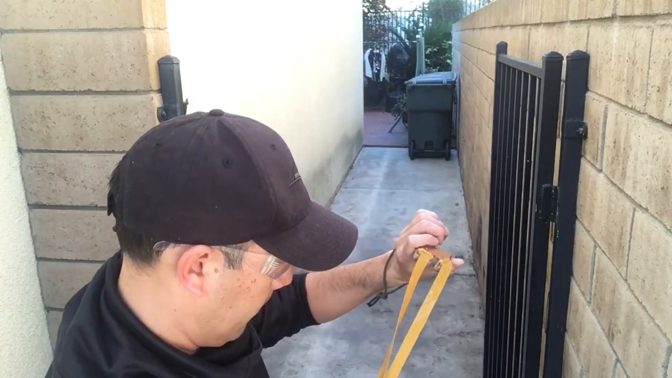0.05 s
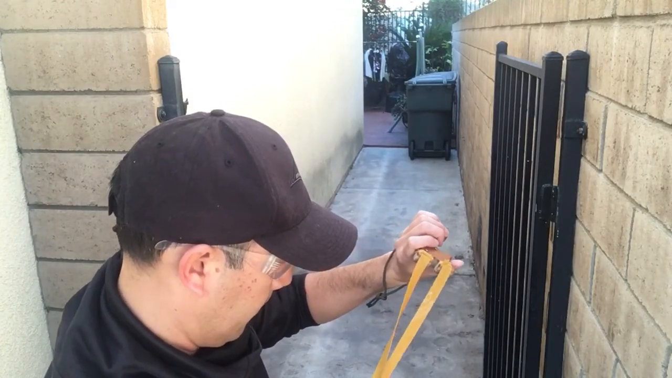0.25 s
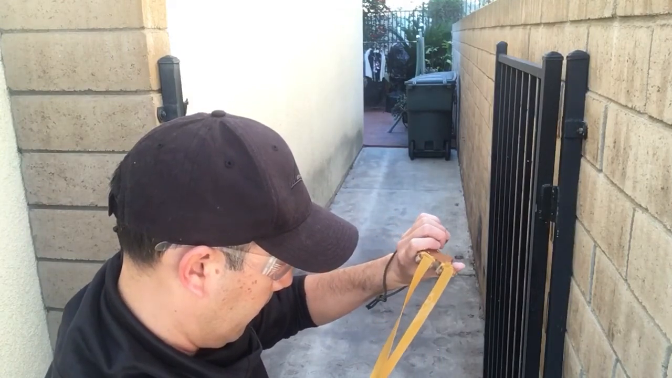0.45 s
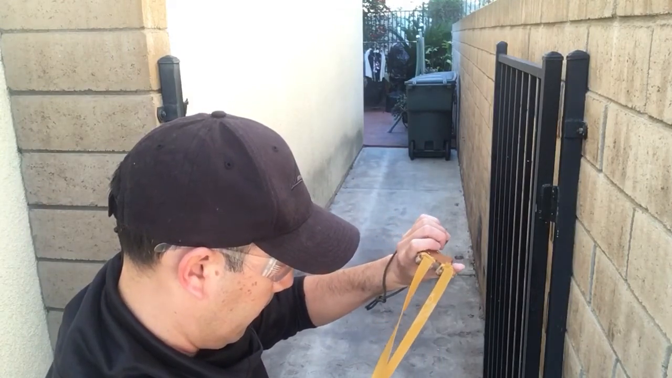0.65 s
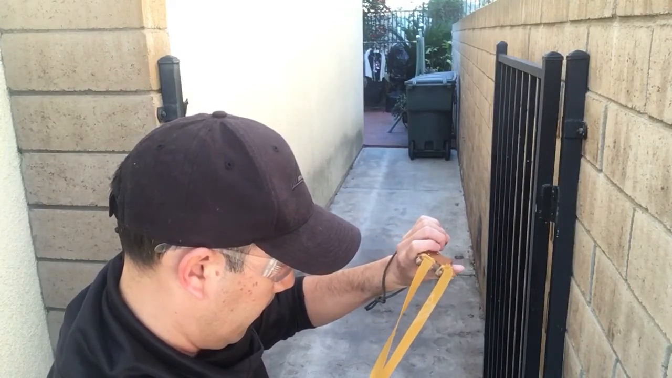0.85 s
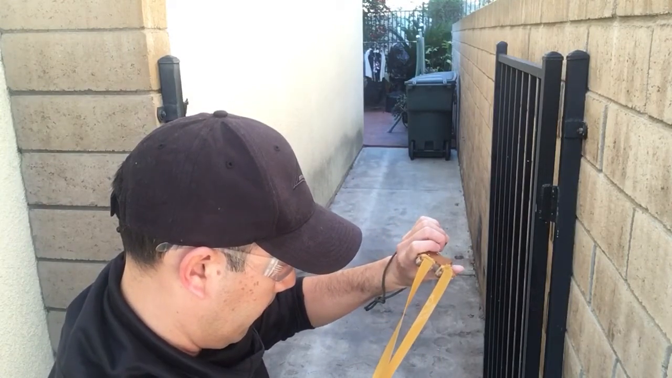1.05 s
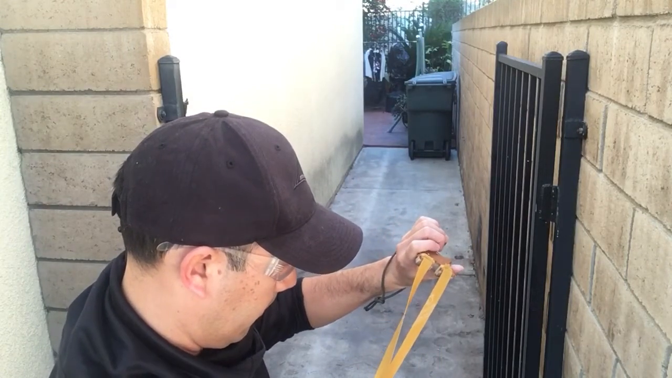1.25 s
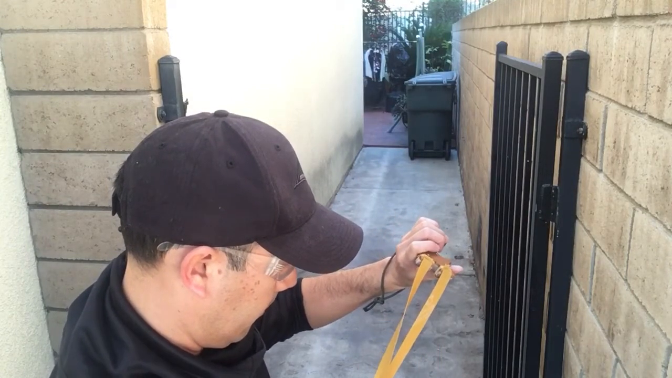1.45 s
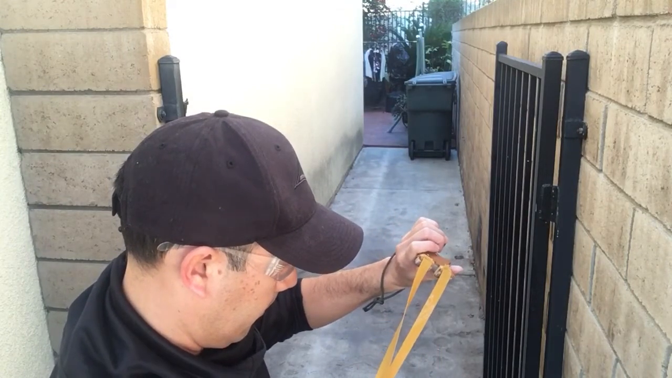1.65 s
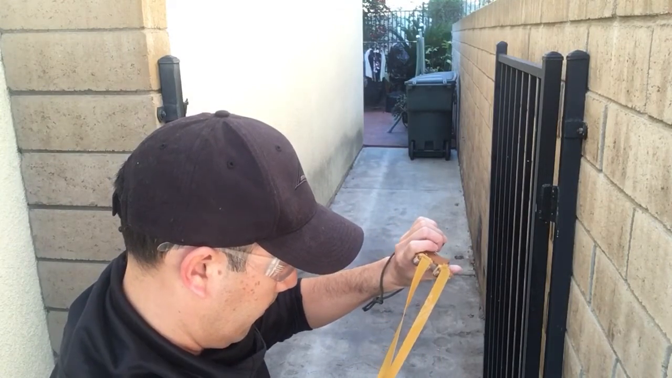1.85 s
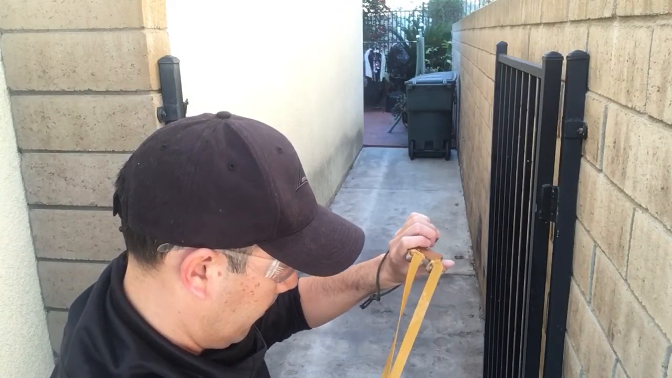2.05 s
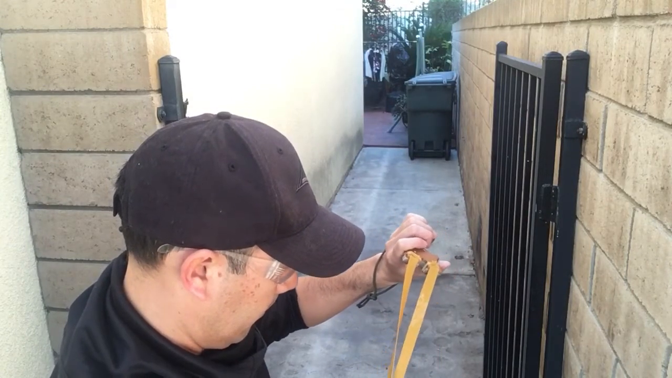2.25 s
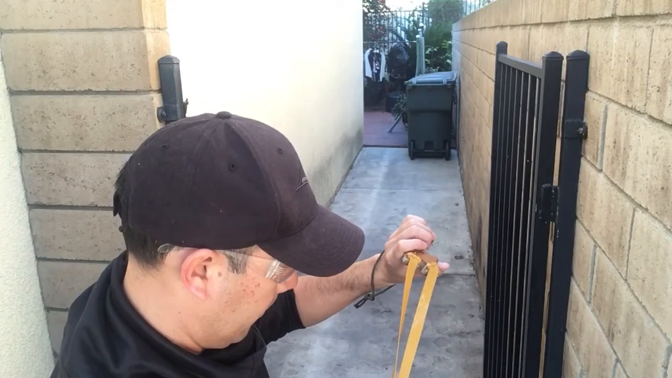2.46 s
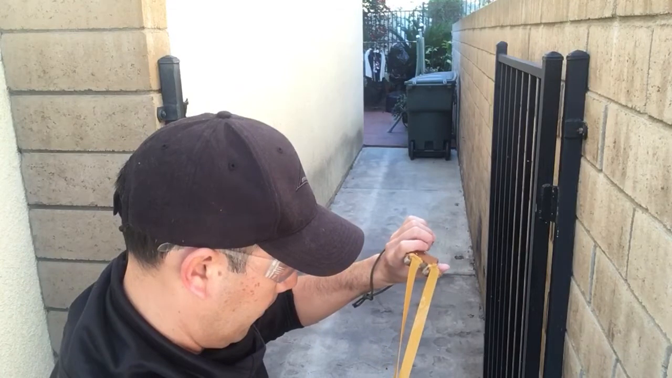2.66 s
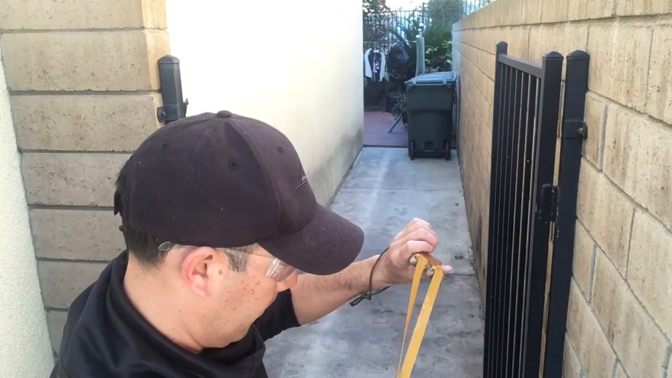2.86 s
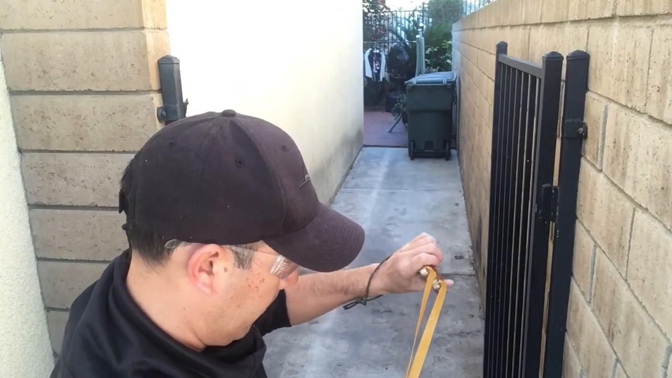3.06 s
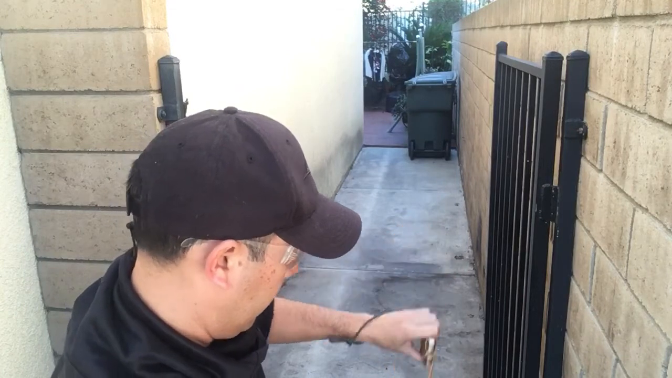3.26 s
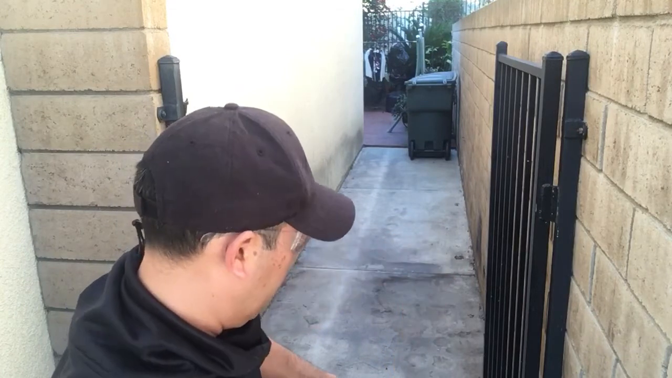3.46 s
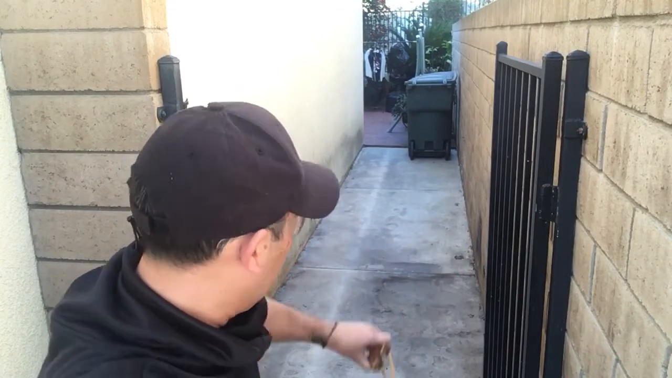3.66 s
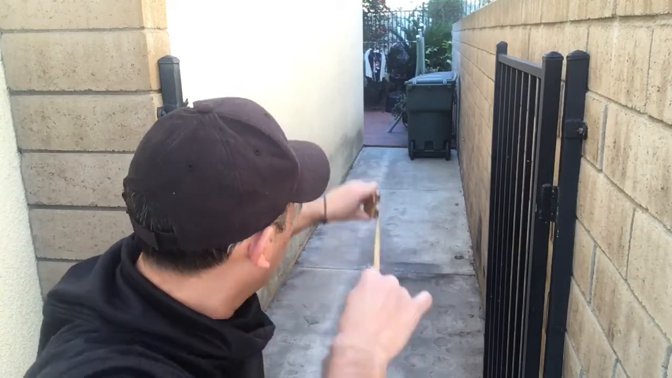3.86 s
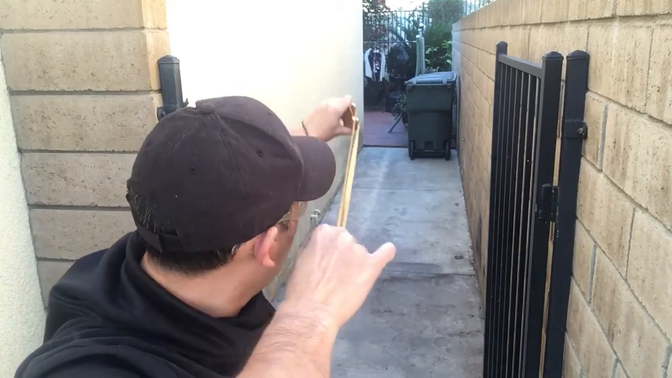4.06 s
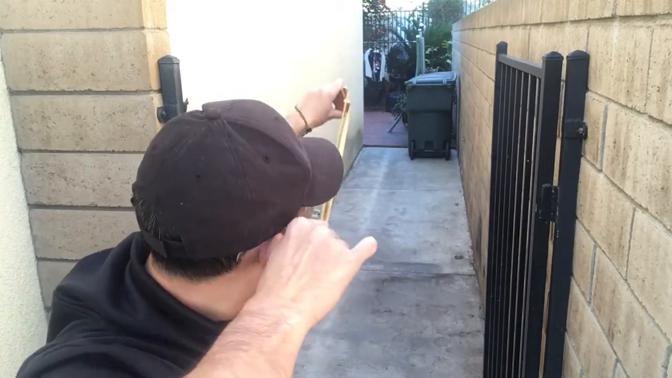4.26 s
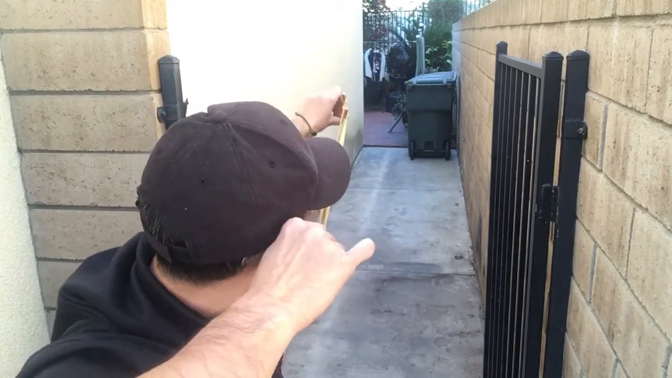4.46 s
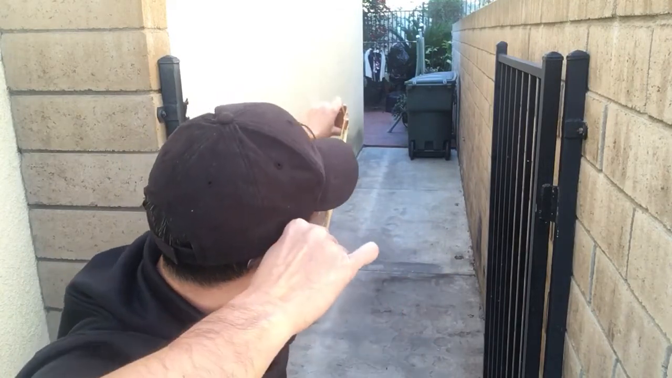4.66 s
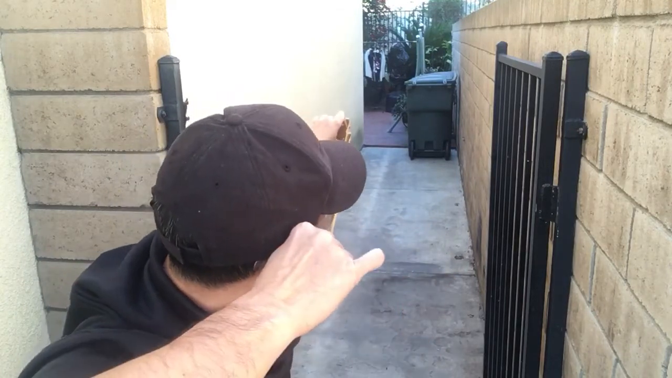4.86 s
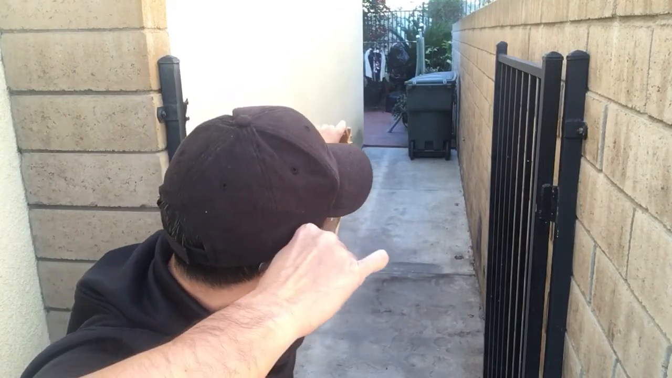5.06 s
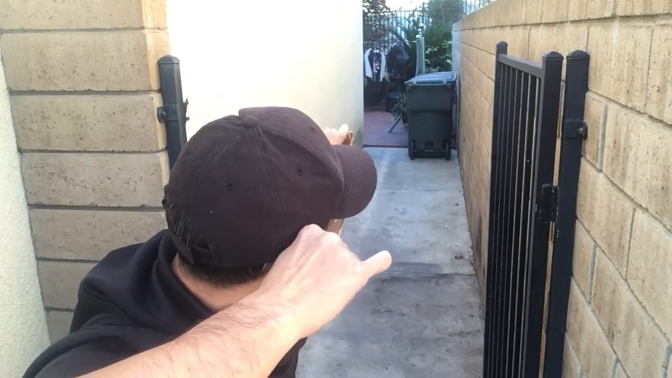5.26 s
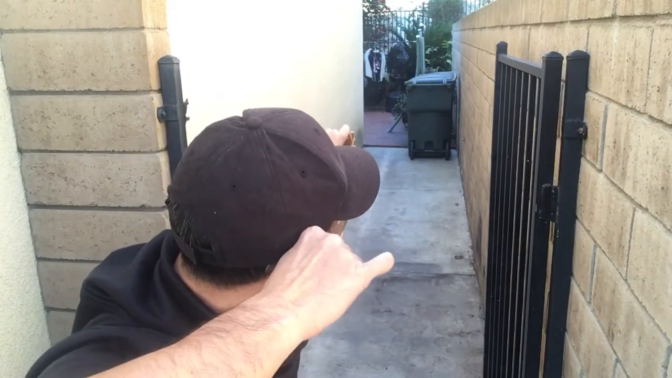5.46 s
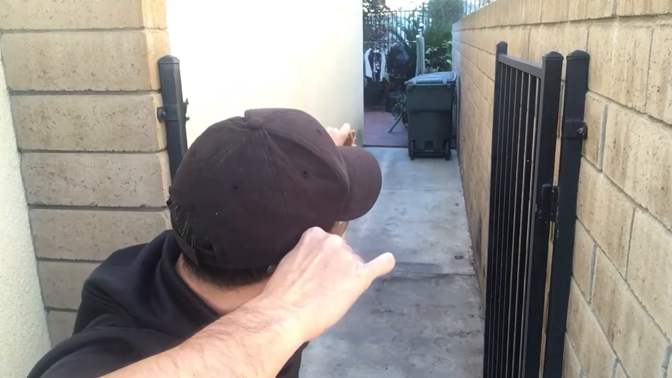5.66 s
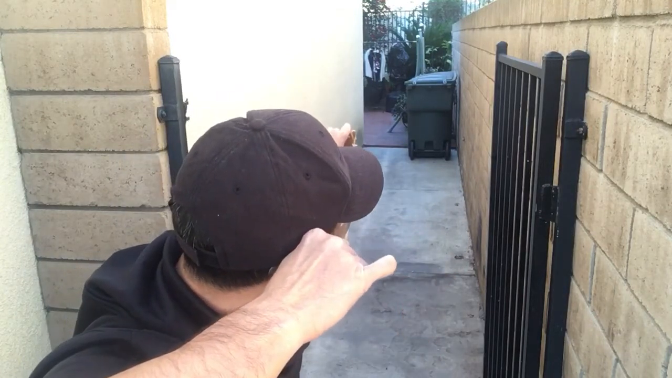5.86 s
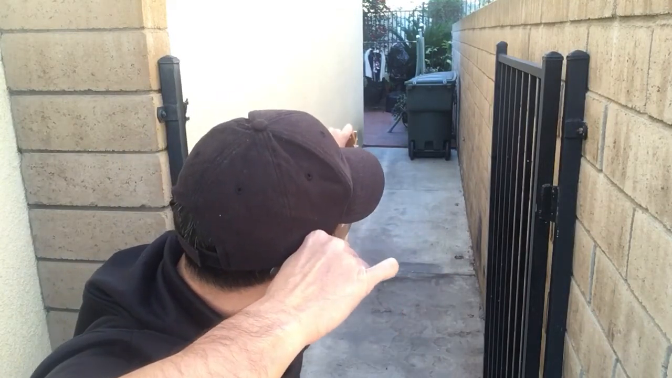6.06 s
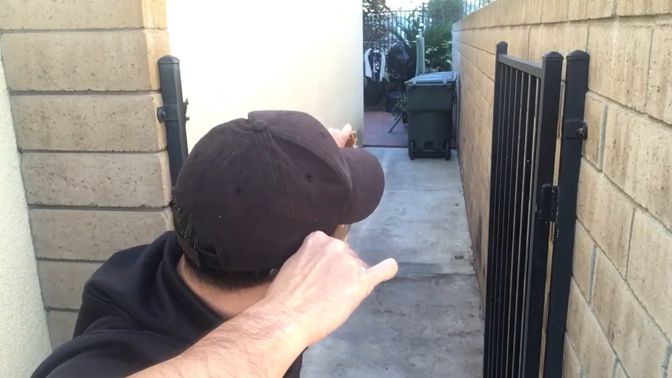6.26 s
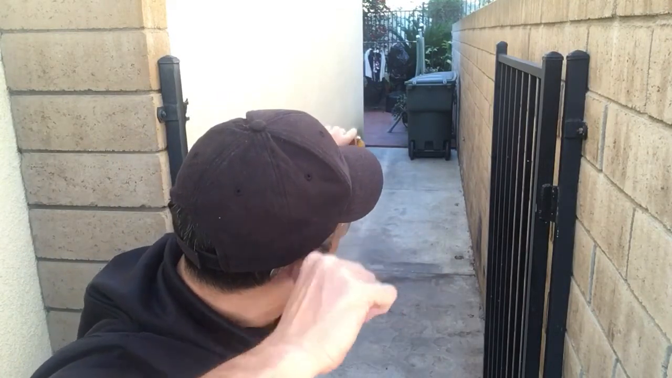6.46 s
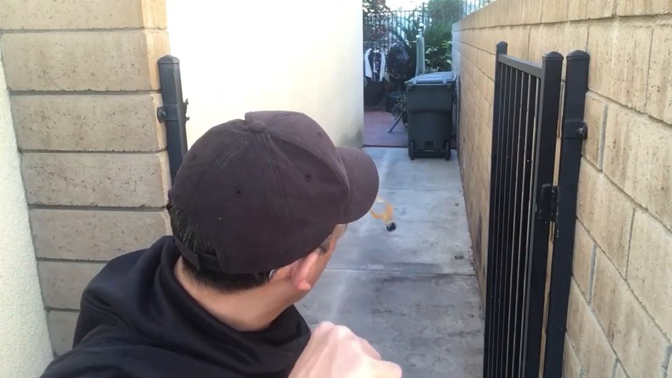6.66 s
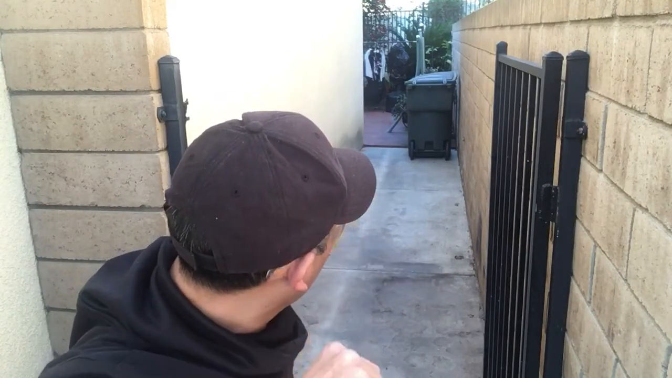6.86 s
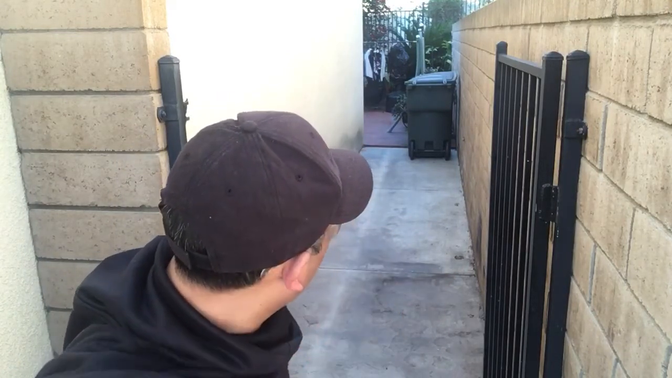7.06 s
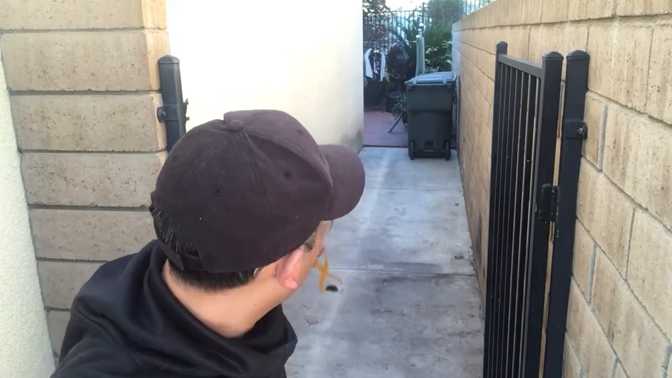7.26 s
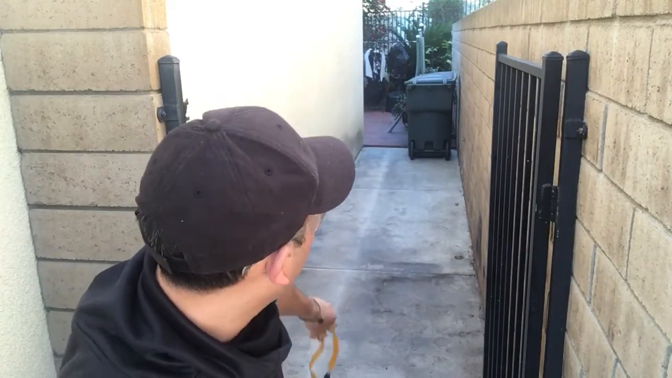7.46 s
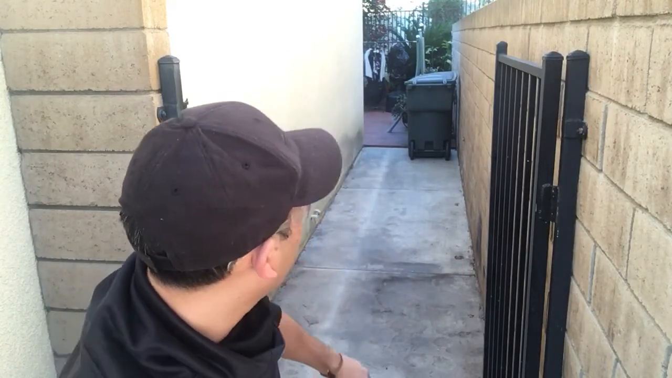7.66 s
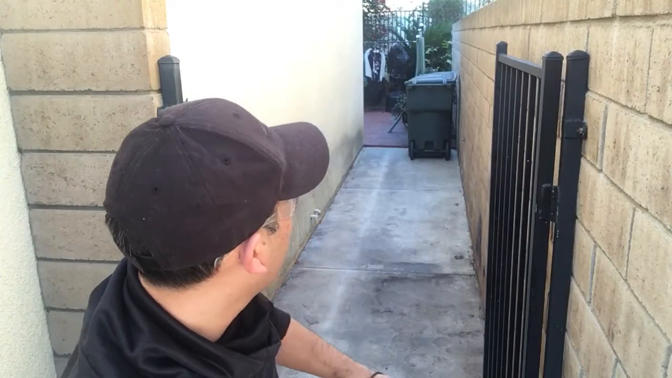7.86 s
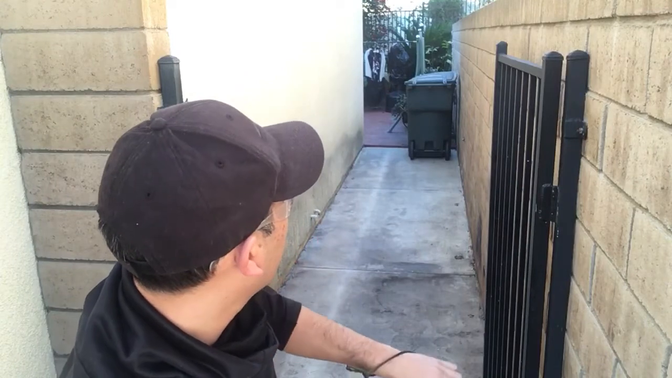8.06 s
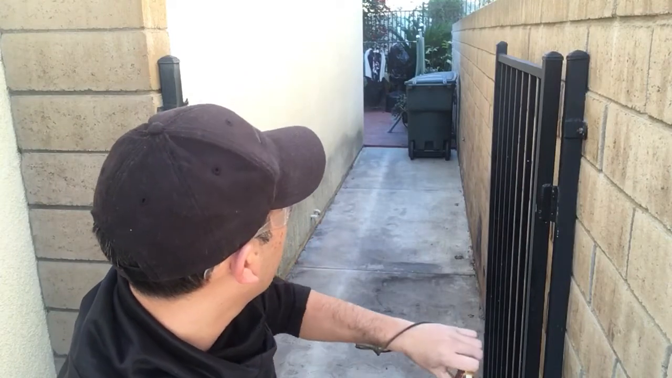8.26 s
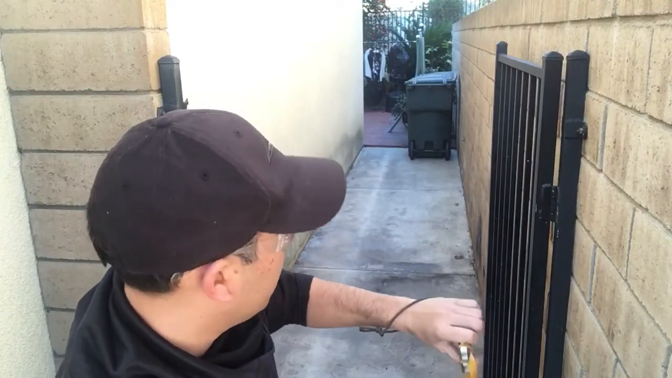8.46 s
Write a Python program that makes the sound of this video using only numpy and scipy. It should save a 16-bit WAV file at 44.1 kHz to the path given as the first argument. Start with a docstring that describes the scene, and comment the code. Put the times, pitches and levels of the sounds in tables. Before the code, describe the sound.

Close microphone in a hard-walled outdoor passage, with a distant engine humming deep beneath faint hiss. Nearly quiet handling comes first: a tiny rubbery squeak, dull scuff and small clicks. Then a papery snap and bright slap of rubber, a sharp hard knock with brief metal ring, a quick tinny clatter on concrete, and finally soft rustles and a fluttering airy rush.

```python
"""A slingshot shot in a narrow concrete side yard, under a distant engine, probably a propeller plane, sinking in pitch.
First comes a faint squeak and a dull scuff, then small clicks and a soft, fluttering rush. The rubber bands
whip forward and slap; a quarter of a second later the ball knocks into the target, and something tinny, probably
a can, bounces on the ground. The walls ring briefly; faint clicks, brushing and the soft rush follow. Noise bursts
make the contacts, dying sine waves the ringing metal, steady sine waves and shaped noise the plane."""
import sys
import numpy as np
from scipy import signal
from scipy.fft import rfft, irfft, next_fast_len
from scipy.io import wavfile
from scipy.ndimage import uniform_filter1d

SR = 44100
rng = np.random.default_rng(int(sys.argv[2]) if len(sys.argv) > 2 else 0)


def log_audio(samples):
    """Write samples as a 16-bit WAV file to the path given in sys.argv[1]."""
    # one column per channel
    frames = np.atleast_2d(samples).T
    # limit to full scale, then quantise
    limited = np.clip(frames, -1, 1)
    pcm = np.round(limited * 32767).astype(np.int16)
    wavfile.write(sys.argv[1], SR, pcm)


N = 375291
TIME = np.arange(N) / SR  # seconds


def undb(db):
    """Turn decibels into a plain multiplier."""
    return 10 ** (np.asarray(db) / 20)


def unit(x):
    """Scale a sound to an average (rms) strength of 1."""
    return x / np.sqrt(np.mean(x ** 2))


def curves(table):
    """Join each column of a table by straight lines in time."""
    s, *columns = np.transpose(table)
    return [np.interp(TIME, s, column) for column in columns]


def walk(rate):
    """A smooth random wandering: values held for 1 / rate seconds, then averaged twice; spread near 1."""
    hold = int(SR / rate)
    steps = np.repeat(rng.standard_normal(N // hold + 1), hold)
    smooth = uniform_filter1d(uniform_filter1d(steps, hold), hold)
    return 1.3 * smooth[:N]


def swell(peak_s, half_s):
    """A smooth bell-shaped rise and fall, 1 at its peak."""
    return np.exp(-((TIME - peak_s) / half_s) ** 2)


def through(x, response):
    """Pass a sound through a filter given by its impulse response."""
    return signal.fftconvolve(x, response)[:N]


def colour(points, size=4096):
    """Build a filter with the given spectrum that acts as early as possible and has unit energy."""
    hz, db = np.transpose(points)
    bins = np.maximum(np.arange(size // 2 + 1) * SR / size, 1)
    gain = undb(np.interp(np.log(bins), np.log(hz), db))
    # folding the cepstrum onto positive times gives a minimum-phase filter
    cepstrum = irfft(np.log(gain))
    cepstrum[1:size // 2] *= 2
    cepstrum[size // 2 + 1:] = 0
    response = irfft(np.exp(rfft(cepstrum)))
    return response / np.linalg.norm(response)


def contacts(table, rise_s, grain_db):
    """Each contact is a burst of tiny uneven impacts that swells and dies away."""
    power = np.zeros(N)
    for s, db, t60 in table:
        near = slice(max(int((s - .1) * SR), 0), int((s + .4) * SR))
        age = TIME[near] - s
        rise_or_fall = np.minimum(age / rise_s, -age * np.log(1000) / t60)
        power[near] += undb(db) ** 2 * np.exp(2 * rise_or_fall)
    grains = rng.standard_normal(N) * undb(grain_db * rng.standard_normal(N))
    return np.sqrt(power) * unit(grains)


def ringing(table, modes, scatter_db):
    """Every blow sets the modes ringing, each a little differently with the spot that is hit."""
    hz, db, t60 = np.transpose(modes)
    age = TIME[:SR * 3 // 4]
    rings = np.exp(np.outer(2j * np.pi * hz - np.log(1000) / t60, age))
    out = np.zeros(N + len(age))
    for s, blow_db, *_ in table:
        size = undb(blow_db + db + scatter_db * rng.standard_normal(len(hz)))
        turn = np.exp(2j * np.pi * rng.random(len(hz)))  # random starting phases
        start = int(s * SR)
        out[start:start + len(age)] += ((size * turn) @ rings).imag
    return out[:N]


def hiss():
    """A faint steady hiss of shaped noise."""
    # spectrum of the hiss: (frequency [Hz], relative level [dB])
    hiss_spectrum = [(100, -6.5), (3500, 3.5), (5000, -1), (7000, 1), (9700, -1.5), (10500, -6.5),
                     (11500, -3), (15500, -11)]
    return undb(-79.0) * through(rng.standard_normal(N), colour(hiss_spectrum))


def yard(x, echo_s, echo_db, count=18):
    """Reverberation: each band stores the energy it is fed and lets it die, the middle pitches slowest."""
    # reverberation between the walls: (frequency [Hz], level [dB], time to fall 60 dB [s])
    wall_bands = [(99.2, 2.5, .3), (400, -1, 0.33), (900, -2, 0.57), (2000, 2, 0.4), (3997, -3.5, 0.34),
                  (7000, -4.5, 0.36), (10870, -4.5, .29), (16500, -3.5, .22)]
    hz, db, t60 = np.transpose(wall_bands)
    age = TIME[:SR]
    size = next_fast_len(N, real=True)
    # the far end of the passage returns the sound once more
    x = x + undb(echo_db) * np.interp(TIME - echo_s, TIME, x, left=0)
    sound, noise = rfft(x, size), rfft(rng.standard_normal(size))
    centres = np.linspace(np.log(hz[0]), np.log(hz[-1]), count)
    log_bins = np.log(np.arange(len(sound)) * SR / size + 1)
    tail = 0
    for centre, share in zip(centres, np.eye(count)):
        band = np.sqrt(np.interp(log_bins, centres, share))
        band_t60 = np.interp(centre, np.log(hz), t60)
        build_up = 1 - np.exp(-age / 0.0048)
        fade = np.exp(-2 * np.log(1000) * age / band_t60) * build_up
        fed = irfft(sound * band, size)[:N] ** 2
        energy = np.abs(through(fed, fade / fade.sum()))
        band_noise = unit(irfft(noise * band, size)[:N])
        tail = tail + undb(np.interp(centre, np.log(hz), db)) * np.sqrt(energy) * band_noise
    return tail


def drone(phase):
    """A deep hum and its overtones; each overtone rests at its own level, some swell, and all waver."""
    # level of the deep hum, the first partial: (time [s], level [dB])
    hum_level = [(0.15, -42), (0.9, -40.5), (2.1, -42.5), (2.65, -46.0), (3.2, -44.5), (4.2, -60),
                 (4.55, -51.0), (4.95, -49.5), (5.85, -59), (6.25, -51.5), (6.95, -50), (7.35, -53),
                 (7.8, -48), (8.35, -44.0)]
    # resting levels of the overtones: (multiple of the hum's pitch, level [dB])
    overtones = [(2, -67.5), (3, -61.5), (4, -67), (5, -66.5), (6, -66), (7, -66.5), (8, -70.5), (9, -82.5),
                 (10, -72), (13, -74.5), (14, -77)]
    # single overtones swell and fade as the plane moves: (multiple, peak time [s], level [dB], half length [s])
    overtone_swells = [(2, 1.19, -46, 1.22), (2, 3.7, -54, 1.3), (2, 9.6, -56, 0.95), (3, 0.44, -54, 1.12),
                       (3, 4.1, -49.5, 2.31), (3, 8.2, -54, 0.59), (4, 1.5, -59, 0.43),
                       (4, 5.0, -56.5, 1.3), (5, 4.0, -61, 0.96), (6, 1.37, -63, 0.3),
                       (6, 4.13, -58.5, 0.48), (9, 1.85, -59.5, .65)]
    hum_waver_db, overtone_waver_db = .6, .9
    hum_db, = curves(hum_level)
    partials = [(1, undb(hum_db + hum_waver_db * walk(6.1)))]
    for k, rest_db in overtones:
        size_squared = undb(rest_db) ** 2
        for multiple, s, db, half_s in overtone_swells:
            if round(multiple) == round(k):
                size_squared = size_squared + (undb(db) * swell(s, half_s)) ** 2
        partials.append((round(k), np.sqrt(size_squared) * undb(overtone_waver_db * walk(4))))
    out = 0
    for k, size in partials:
        out = out + np.sqrt(2) * size * np.sin(k * phase + 2 * np.pi * rng.random())
    return out


def plane():
    """The propeller's drone over a surging rush of air that throbs with the blades, and a roar that recedes."""
    # blade-passing rate, lowered by the Doppler shift: (time [s], rate [Hz])
    blade_rate = [(0, 81.4), (2, 79.85), (5, 77.5), (8.5, 75.25)]
    # spectrum of the rush of air: (frequency [Hz], relative level [dB])
    rush_spectrum = [(20, -25), (50, 0), (110, 3.5), (200, 2), (350, -16.5), (600, -9), (950, -11.5),
                     (1300, -19), (1750, -21), (2200, -34), (3500, -40.5), (6000, -55.5)]
    # the rush surges above its slowly falling level: (peak time [s], rise [dB])
    surges = [(1.8, 2.5), (4.05, 2), (5.45, 2.5), (8.05, 4.5)]
    # spectrum of the roar: (frequency [Hz], relative level [dB])
    roar_spectrum = [(120, -27.5), (280, 8), (380, -4), (500, -10.5), (900, -26), (3000, -51)]
    rush_start_db, surge_half_s, rush_fade_db_per_s = -53, 0.51, 0.2746
    roar_start_db, passes_s, roar_fade_db_per_s = -61.5, 3.4, 1.5

    rate_hz, = curves(blade_rate)
    phase = 2 * np.pi * np.cumsum(rate_hz * (1 + .0008 * walk(5))) / SR
    air = rng.standard_normal(N) * (1 + 0.12 * np.cos(phase))
    surge_db = sum(db * swell(s, surge_half_s) for s, db in surges)
    rush_db = rush_start_db - rush_fade_db_per_s * TIME + surge_db
    rush = unit(through(air, colour(rush_spectrum))) * undb(rush_db + 0.73 * walk(8))
    # the roar holds until the plane has passed, then recedes
    roar_db = roar_start_db - roar_fade_db_per_s * np.maximum(TIME - passes_s, 0)
    roar = through(rng.standard_normal(N), colour(roar_spectrum)) * undb(roar_db)
    return drone(phase) + rush + roar


def soft_rush():
    """A soft, fluttering rush of noise near 1.7 kHz that swells twice."""
    # swells of the soft rush: (peak time [s], level [dB], half length [s])
    rush_swells = [(3.954, -67, 0.25), (8.0, -67.5, 0.38)]
    # spectrum of the soft rush: (frequency [Hz], relative level [dB])
    soft_spectrum = [(500, -8), (1350, -9), (1680, 10), (1950, -11.5), (3400, -13.5), (5000, -21.5),
                     (7000, -19), (15000, -30.5)]
    size = sum(undb(db) * swell(s, half_s) for s, db, half_s in rush_swells)
    return size * undb(2 * walk(30)) * through(rng.standard_normal(N), colour(soft_spectrum))


def brushes():
    """Sleeve and slack bands brush: soft bursts of very uneven noise."""
    # brushing contacts: (time [s], level [dB], time to fall 60 dB [s])
    brush_times = [(6.096, -69, .05), (7.6604, -63, .06), (7.725, -66, 0.16), (7.8455, -60, .1),
                   (7.8734, -60, 0.081), (8.1204, -61.5, 0.069)]
    # spectrum of the rustle: (frequency [Hz], relative level [dB])
    rustle_spectrum = [(400, -13), (1200, 6), (3300, 6), (5500, -4), (9000, -6), (15000, -28)]
    return through(contacts(brush_times, rise_s=0.0019, grain_db=8), colour(rustle_spectrum))


def faint_clicks():
    """Small faint clicks, probably of handling, before and after the shot: bright bursts of noise."""
    # clicks: (time [s], level [dB], time to fall 60 dB [s])
    click_times = [(1.999, -69, .04), (3.6447, -51.5, 0.026), (7.55, -72, 0.25), (7.598, -68, .06),
                   (8.123, -73, .06)]
    # spectrum of a click: (frequency [Hz], relative level [dB])
    click_spectrum = [(1000, -21), (5000, -8), (8000, 0), (12000, 8), (15500, -2)]
    return through(contacts(click_times, rise_s=.0007, grain_db=2), colour(click_spectrum))


def squeak():
    """Probably rubber that sticks and slips, strong and weak in turn, adding lines between the harmonics."""
    # pitch of the squeak: (time [s], pitch [Hz])
    squeak_pitch = [(.23, 1394), (.35, 1263), (.44, 1310), (.53, 1190)]
    # spectrum of the squeak: (frequency [Hz], relative level [dB])
    squeak_spectrum = [(1200, -20), (2500, -6), (3900, 4), (5200, -4), (7000, -18), (12000, -32)]
    # the squeak ends in a dull scuff: (time [s], level [dB], time to fall 60 dB [s])
    scuff_times = [(.551, -59, .25)]
    # spectrum of the scuff: (frequency [Hz], relative level [dB])
    scuff_spectrum = [(400, -7), (1300, 4), (3300, 4), (5500, -8), (9000, -18), (15000, -32)]
    hz, = curves(squeak_pitch)
    phase = 2 * np.pi * np.cumsum(hz * (1 + .018 * walk(700))) / SR
    lines = 0
    for k in range(1, 7):
        pair = np.sin(k * phase) + undb(-4) * np.sin((k + .5) * phase)
        lines = lines + undb(3 * walk(50)) * pair
    slips = unit(lines) + rng.standard_normal(N)  # equal parts of tone and noise
    tone = unit(through(slips, colour(squeak_spectrum))) * undb(-69) * swell(peak_s=.41, half_s=0.2)
    scuff = through(contacts(scuff_times, rise_s=0.0036, grain_db=3), colour(scuff_spectrum))
    return tone + scuff


def can():
    """Thin metal scrapes on concrete and rings at each bounce, one rim after the other."""
    # bounces and rolling: (time [s], level [dB], time to fall 60 dB [s], second rim relative to first [dB])
    bounces = [(6.926, -48.5, 0.2, -1.5), (6.9791, -41.5, 0.069, -0.5), (7.0659, -45, 0.093, -3),
               (7.175, -41.5, 0.037, -20), (7.261, -49, 0.22, -11), (7.3222, -41.5, 0.12, -2),
               (7.518, -60.5, 0.28, -13)]
    # spectrum of the scrape: (frequency [Hz], relative level [dB])
    tin_spectrum = [(300, -26), (700, -10.5), (1100, 2.5), (1700, -10), (2000, -13), (2500, -3.5),
                    (3400, -7), (4500, -10.5), (5400, -17), (9000, -20), (15000, -33)]
    # ringing modes of the can: (frequency [Hz], relative level [dB], time to fall 60 dB [s])
    can_modes = [(824, -11, .6), (1075, 2, .12), (1114, 0, .18), (1195, -3, .22), (1375, -2, .35),
                 (1507, -7, .3), (1700, -2, .15), (2285, -5, .22), (2358, -7, .15), (2552, -3, .22),
                 (2929, -7, .24), (3283, -4, .16), (3650, -9, .2), (3820, -10, .22), (4520, -9, .18),
                 (8385, -14, .1)]
    rim_lag_s = 0.019  # it lands on one rim, then tips onto the other
    first = [(s, db, t60) for s, db, t60, _ in bounces]
    second = [(s + rim_lag_s, db + rim_db, t60) for s, db, t60, rim_db in bounces]
    scrape = through(contacts(first + second, rise_s=0.0022, grain_db=3), colour(tin_spectrum))
    shell = undb(-5.3) * ringing(first + second, can_modes, scatter_db=3)
    return scrape, shell


def ping():
    """A thin, unsteady tone with a weak octave swells and fades in the tail of the hit."""
    # the ping: (peak time [s], pitch [Hz], level [dB], half length [s])
    ping_shape = (6.893, 3650, -49, .018)
    s, hz, db, half_s = ping_shape
    phase = 2 * np.pi * np.cumsum(hz * (1 + .02 * walk(600))) / SR
    tone = np.sin(phase) + undb(-10) * np.sin(2 * phase)
    return undb(db) * swell(s, half_s) * tone


def target():
    """A hard crack and rattle of noise bursts; the first, full-speed blow rings the panel."""
    # the ball strikes the target and rattles in it: (time [s], level [dB], time to fall 60 dB [s])
    knocks = [(6.6854, -10, 0.026), (6.6888, -8.5, 0.0093), (6.6914, -10, 0.013), (6.696, -16.5, 0.046)]
    # spectrum of the knock: (frequency [Hz], relative level [dB])
    knock_spectrum = [(80, -35), (200, -22), (340, -6.5), (490, -10.5), (750, -2.5), (1130, 2),
                      (1600, -4.5), (2200, -7), (4400, -0.5), (6000, -7.5), (8500, -6.5), (11000, -12.5),
                      (15500, -15.5)]
    # ringing modes of the target: (frequency [Hz], relative level [dB], time to fall 60 dB [s])
    target_modes = [(280, -4, .12), (385, -1, .09), (748, 3, .23), (820, 2, .23), (1064, 4, .1),
                    (1113, 4, .1), (1149, 8, .13), (1197, 1, .15), (1268, -2, .2), (1514, -6, .22),
                    (1608, -5, .2), (1638, -5, .2), (1778, -3, .2), (1939, -8, .22), (2016, -8, .2),
                    (2600, -10, .25), (2837, -9, .27), (3366, -4, .16), (4292, -2, .13), (4620, -3, .14),
                    (5104, -4, .13), (8000, -1, .08)]
    crack = through(contacts(knocks, rise_s=.00015, grain_db=3.0), colour(knock_spectrum))
    panel = undb(-16.5) * ringing(knocks[:1], target_modes, scatter_db=1.5)
    return crack, panel


def whistle():
    """Eddies shed by the moving rubber; their pitch sags as it slows."""
    # whistles on the way out and again at the slap: (peak time [s], pitch at the peak [Hz], level [dB])
    whistles = [(6.439, 1088, -40.5), (6.476, 985, -37.5)]
    half_s, sag_oct_per_s = 0.0084, 40
    out = 0
    for s, hz, db in whistles:
        octaves = np.clip(sag_oct_per_s * (s - TIME), -1, 1)
        phase = 2 * np.pi * np.cumsum(hz * 2 ** octaves * (1 + .05 * walk(500))) / SR
        out = out + np.sqrt(2) * undb(db) * swell(s, half_s) * np.sin(phase)
    return out


def rubber_bands():
    """Rubber flaps low and papery, whistles, then slaps bright."""
    # the bands snap forward and flap: (time [s], level [dB], time to fall 60 dB [s])
    flap_times = [(6.4183, -42.5, 0.051), (6.432, -37, .04), (6.4385, -24.5, 0.038), (6.4445, -17, 0.022),
                  (6.453, -24.5, 0.066)]
    # spectrum of the flapping rubber: (frequency [Hz], relative level [dB])
    rubber_spectrum = [(15, -26.5), (45, 0.5), (150, 3.5), (350, 6), (700, -6.5), (1300, 1), (2000, -0.5),
                       (2800, -3), (5000, -12), (9000, -5), (15000, -18.5)]
    # bands and pouch slap at the end of their travel: (time [s], level [dB], time to fall 60 dB [s])
    slap_times = [(6.469, -18, 0.017), (6.4725, -12.5, 0.016), (6.478, -16, 0.053)]
    # spectrum of the slap: (frequency [Hz], relative level [dB])
    slap_spectrum = [(100, -19), (400, -13.5), (900, -9), (2000, -6.5), (3500, -3.5), (6000, 3), (8000, 0),
                     (11000, -7), (15500, -8)]
    flaps = through(contacts(flap_times, rise_s=0.0012, grain_db=3), colour(rubber_spectrum))
    slaps = through(contacts(slap_times, rise_s=0.0023, grain_db=3.5), colour(slap_spectrum))
    return flaps + slaps + whistle()


def scene():
    """The shot and the small sounds scatter between the walls; the plane and a faint hiss lie under them."""
    near = rubber_bands() + faint_clicks() + brushes() + squeak() + soft_rush()
    crack, panel = target()
    scrape, shell = can()
    into_yard = undb(-11) * near + undb(-4.5) * crack + undb(-3.5) * scrape
    echoes = yard(into_yard, echo_s=0.062, echo_db=-21.5)
    mix = near + crack + panel + scrape + shell + ping() + echoes + plane() + hiss()
    return mix[None]  # one channel


def record(dry):
    """The microphone rounds the highest peaks, and a steep filter cuts the top of the treble."""
    top_hz = 15900
    rounded = 0.92 * np.tanh(dry / 0.87)
    low_pass = signal.ellip(10, .2, 80, top_hz, fs=SR, output="sos")
    return signal.sosfilt(low_pass, rounded)


dry = scene()
out = record(dry)
log_audio(out)
```